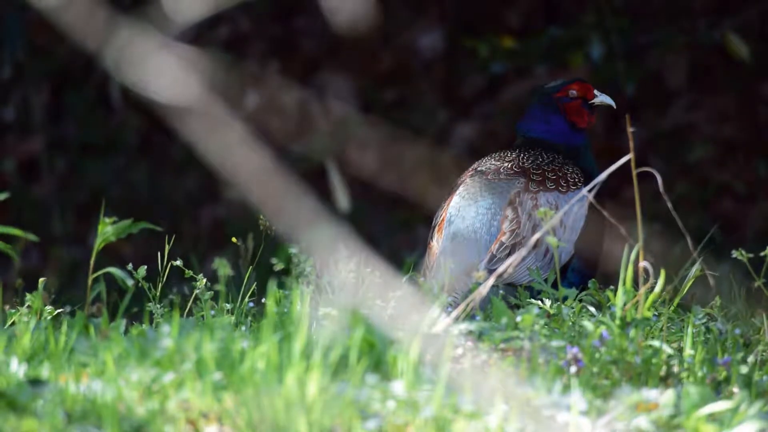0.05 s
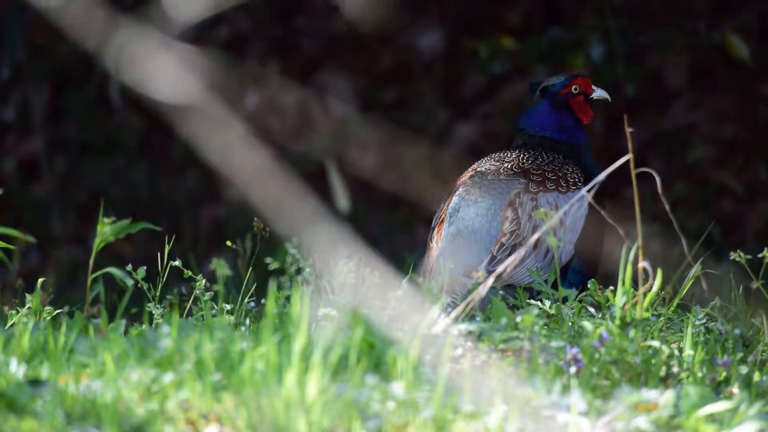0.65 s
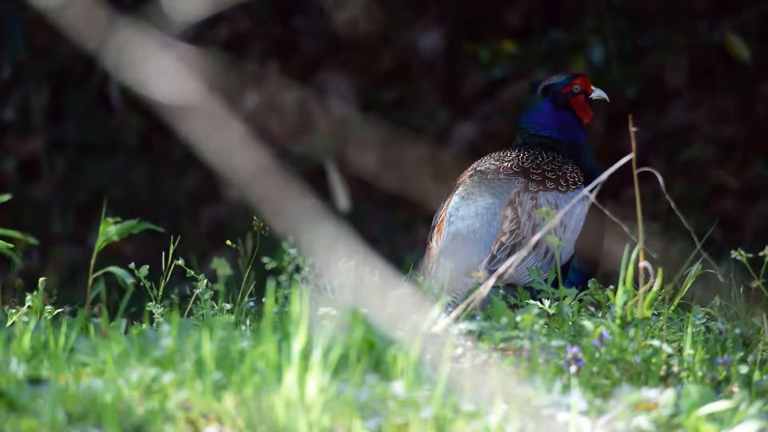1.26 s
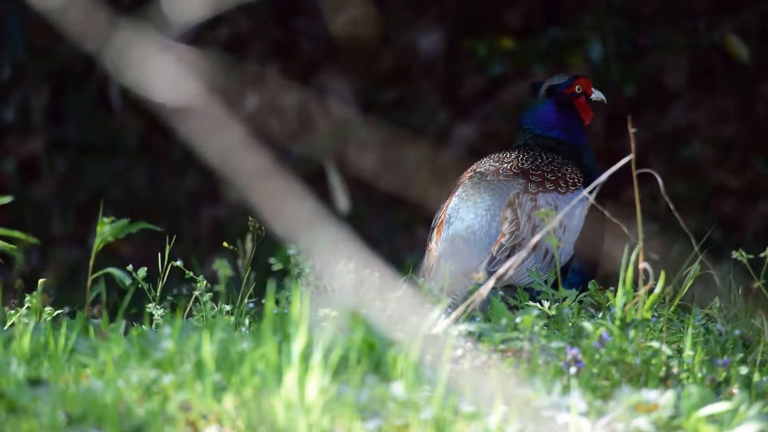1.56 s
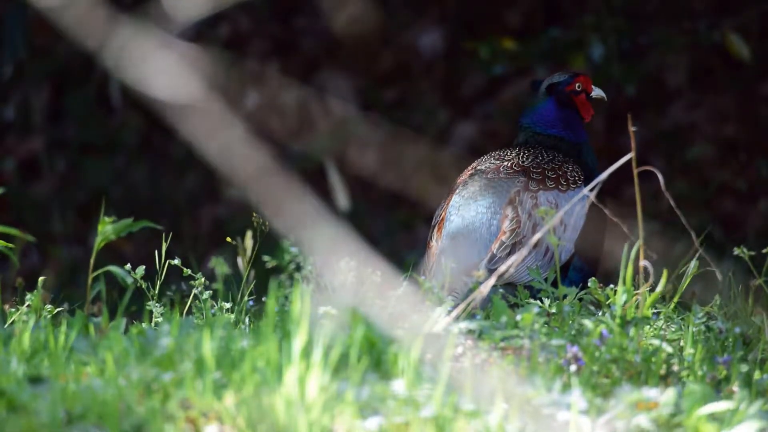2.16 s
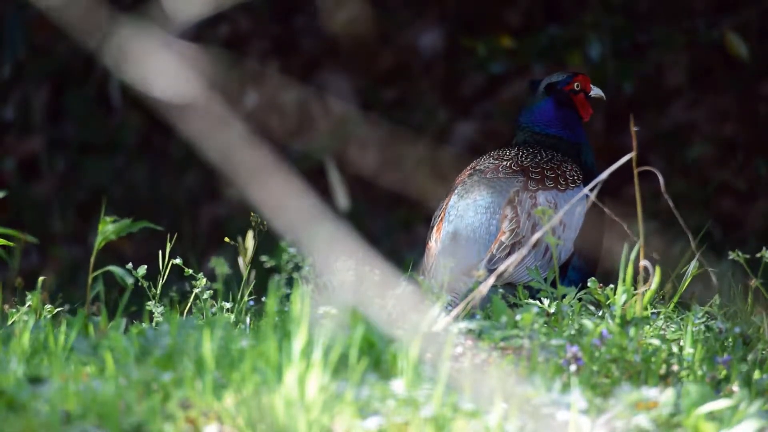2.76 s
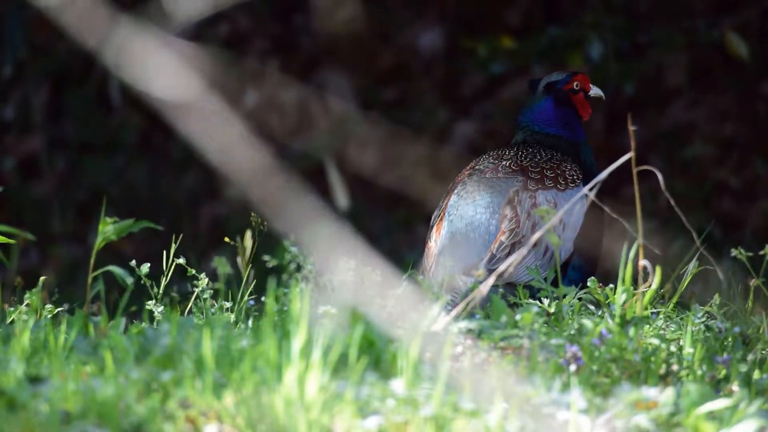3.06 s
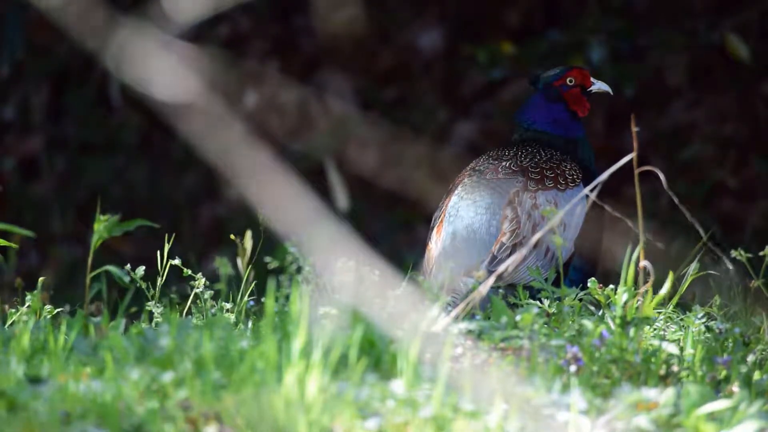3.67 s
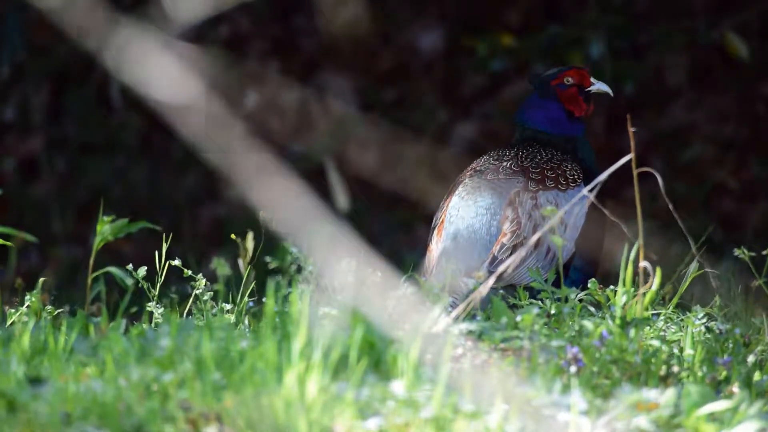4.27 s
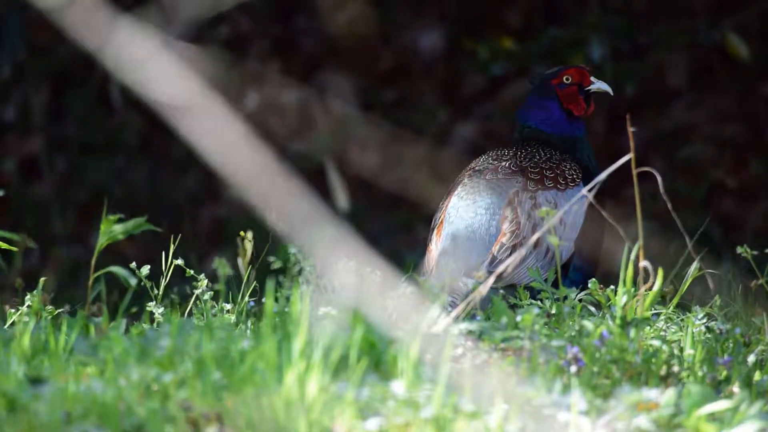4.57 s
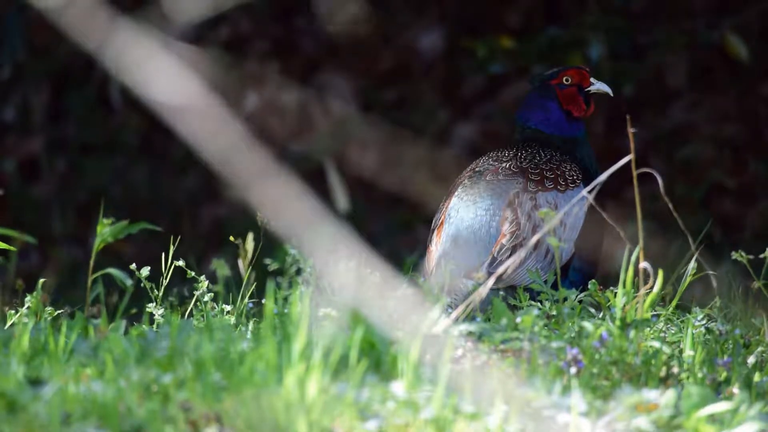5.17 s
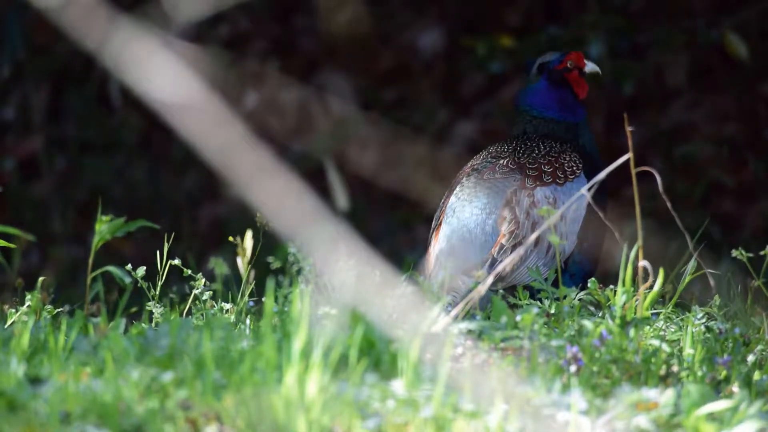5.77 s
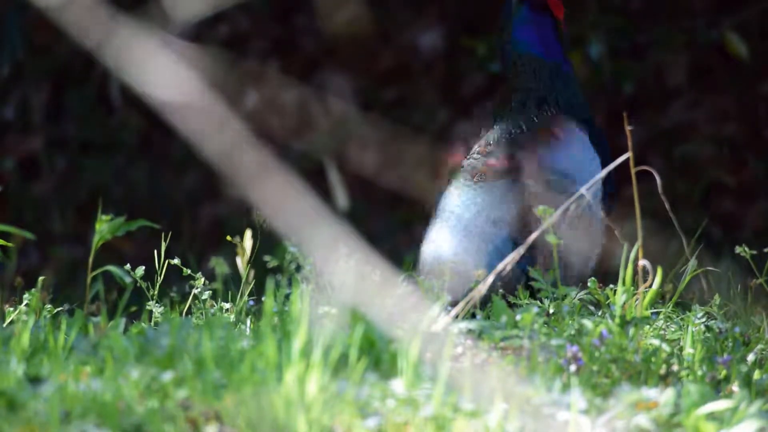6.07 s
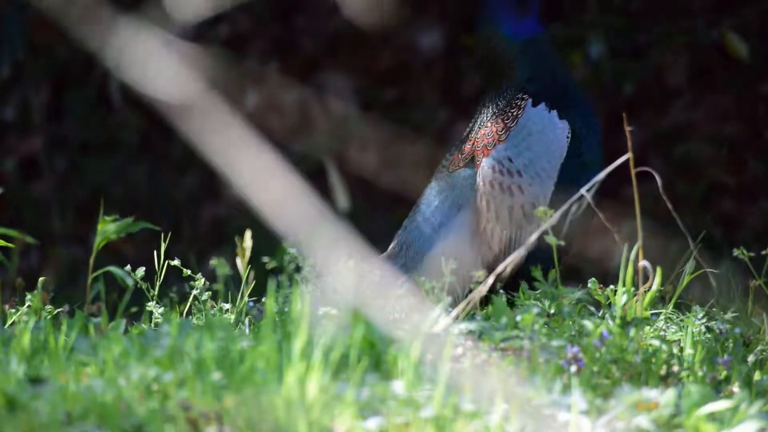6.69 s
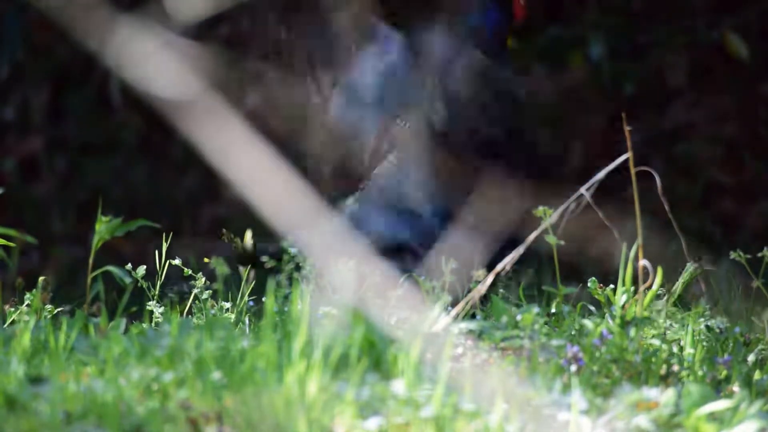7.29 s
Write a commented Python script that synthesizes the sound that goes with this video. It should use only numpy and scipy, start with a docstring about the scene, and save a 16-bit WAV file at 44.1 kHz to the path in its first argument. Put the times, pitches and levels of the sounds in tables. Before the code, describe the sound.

Faint bird calls and a high chirping song lead to two rasping pheasant crows and a quick flutter of wings outdoors.

```python
"""The edge of a wood, on two channels with everything straight ahead of the microphone.
A cock pheasant crows twice, then whirrs his wings. Each crow is a ringing tone from the syrinx under a
rattling rasp of air in the throat; the trees throw it back, and the recorder clicks on the loud second
one. Before it, far birds chip and whistle, grass rustles and a small bird sings looping notes. Behind it
all lies a soft, distant hiss of leaves, with now and then a low bump at the microphone."""
import sys
import numpy as np
from scipy import signal
from scipy.fft import rfft, irfft, next_fast_len
from scipy.io import wavfile
from scipy.ndimage import uniform_filter1d

SR = 44100
rng = np.random.default_rng(int(sys.argv[2]) if len(sys.argv) > 2 else 0)


def generate_wav(signal):
    """Clip the signal to [-1, 1] and save it as 16-bit WAV at the path in sys.argv[1]."""
    frames = np.transpose(np.atleast_2d(signal))
    scaled = np.clip(frames, -1, 1) * 32767
    pcm = np.round(scaled).astype(np.int16)
    wavfile.write(sys.argv[1], SR, pcm)


N = 323253
TIME = np.arange(N) / SR

# Levels in the tables are relative; scene() sets the balance at the microphone.
# spectrum of the distant leaves: (frequency [Hz], level [dB])
LEAF_HISS = [(24, -41), (40, -10.5), (64, -13), (114, -23), (158, -12), (192, -21.5), (342, -5.5),
             (417, -9), (577, -5), (722, -6), (973, -7), (1640, -6.5), (3650, -0.5), (5050, -10),
             (15500, -26.5)]
# the breeze lifts and lowers that hiss: (time [s], level [dB])
BREEZE = [(0, 1.5), (.8, -0.5), (1.5, -1), (2.8, 0.2), (4.1, -0.56), (7.33, 0)]
# soft low bumps at the microphone: (time [s], half length [s], level [dB], top of band [Hz])
MIC_BUMPS = [(0.23, 0.031, -47, 190), (0.256, 0.0086, -34.5, 230), (.52, 0.11, -54.5, 150),
             (0.819, 0.051, -50, 140), (1.0, 0.049, -59, 130), (2.55, 0.2, -58, 140),
             (3.487, 0.039, -53.5, 115), (3.749, 0.13, -62.5, 118), (4.349, 0.049, -47, 134),
             (4.8, 0.43, -62, 138), (6.07, 0.035, -55, 134), (6.117, 0.011, -40.5, 165),
             (6.461, 0.014, -49.5, 140)]
# how long the wood rings: (frequency [Hz], time to fall 60 dB [s])
WOOD_DECAY = [(300, 0.22), (1130, 1.76), (2300, 1.42), (4000, 0.78), (6000, 0.69), (12000, 0.32)]
# far whistles: (time [s], length [s], start pitch [Hz], end pitch [Hz], level [dB])
FAR_WHISTLES = [(1.593, 0.2, 994, 978, -55), (1.729, .1, 970, 990, -47.5), (1.827, 0.16, 968, 1002, -53.5),
                (2.02, 0.097, 970, 1013, -44.5), (2.127, 0.13, 969, 1012, -45.5),
                (2.272, 0.12, 989, 979, -44.5), (2.418, 0.17, 1683, 1516, -47),
                (2.467, .07, 2760, 2560, -40), (2.52, 0.14, 2160, 2126, -43.5)]
# faint chips of other birds in the trees: (time [s], length [s], pitch [Hz], level [dB])
FAR_CHIPS = [(0.609, 0.029, 3580, -43), (0.864, 0.029, 3400, -41), (1.08, 0.088, 4750, -51),
             (1.33, 0.043, 3700, -41.5), (1.43, 0.093, 3550, -46), (1.555, 0.12, 4730, -51),
             (4.27, 0.029, 3550, -42.5)]
# rustles in the grass: (time [s], length [s], level [dB], crispness [0-1])
RUSTLES = [(0, 0.4, -50, 0.02), (0.54, 0.011, -48, 0.8), (0.688, .045, -50, 1), (2.167, 0.15, -45, 0.01),
           (2.187, 0.0056, -38, 0), (2.232, .01, -39, .02), (2.279, 0.035, -38, 0.04),
           (2.3, 0.27, -45, 0.26), (2.397, 0.11, -47, 0.6), (2.548, 0.17, -49, 0.1),
           (3.507, 0.15, -39, 0.03)]
# spectrum of a soft, leafy rustle: (frequency [Hz], level [dB])
LEAFY_RUSTLE = [(200, -46), (600, 0), (1000, 5.5), (1350, 8.5), (1900, 0.5), (3300, 8.5), (5000, -5),
                (9000, -53), (16000, -22)]
# spectrum of a crisp rustle: (frequency [Hz], level [dB])
CRISP_RUSTLE = [(1000, -28), (5000, 0.5), (8000, -1), (11000, 1.5), (13500, -18), (16000, -18)]
# the small bird's notes, arches with sloping tops: (time [s], length [s], top at start [Hz],
# top at end [Hz], rise [s], fall [s], level [dB], swell [dB], half-pitch overtone [dB])
SONG_NOTES = [(4.35, 0.082, 3780, 3414, .001, .001, -44, 10, -13),
              (4.414, 0.073, 3583, 3720, 0.0026, 0.0095, -37.5, 9, -13.5),
              (4.636, 0.031, 7480, 5600, 0.0024, 0.0083, -36.5, 4, -54),
              (4.724, 0.13, 4230, 4330, 0.0075, 0.015, -30.5, 3.5, -60),
              (4.879, 0.048, 4950, 3640, .003, 0.0032, -33.5, -4, -60),
              (5.082, 0.14, 4470, 7500, 0.0095, 0.015, -29, 2, -28),
              (5.225, 0.031, 3150, 4070, 0.0119, 0.00085, -33.5, -7, -11),
              (5.393, .119, 6230, 7570, 0.031, .0115, -30.5, 8, -60),
              (5.523, .085, 6250, 6500, .018, .011, -31.5, -3, -60),
              (5.737, 0.11, 6040, 7930, 0.016, .009, -30, 4.5, -57),
              (5.856, .096, 6280, 6700, 0.017, .012, -31, -2.5, -60)]
# its voice thins as it climbs: (pitch [Hz], level [dB])
SONG_STRENGTH = [(2700, -2), (3100, 4), (4200, 4), (5600, -7.5), (6600, -11), (7500, -13)]
# and buzzes more: (pitch [Hz], buzz [0-1])
SONG_BUZZ = [(3000, .15), (4200, .1), (5400, .65), (7400, .7)]
# the pheasant's wingbeats: (time [s], level [dB], squeak pitch [Hz], half length [s], rebound [dB])
WINGBEATS = [(6.838, -18, 3950, 0.0009, -9), (6.894, -16.5, 3790, 0.0015, 0),
             (6.9629, -9, 3910, 0.0015, -3), (7.0300, -10.5, 3880, 0.0019, -15),
             (7.0967, -9, 3824, 0.0019, -30)]
# spectrum of the air pushed by his wings: (frequency [Hz], level [dB])
WING_AIR = [(40, -24), (110, 2.5), (220, 11), (500, 3.5), (900, 5), (1600, -0.5), (3200, 14.5), (5500, 2),
            (8000, -17), (12600, -8.5), (13500, -24), (16000, -36)]
# main tone of his syrinx, from the fundamental up: (partial level [dB])
CROW_PARTIALS = [-5.5, -1, -12.5, -9, -16]
# tone of its other side, from the fundamental up: (partial level [dB])
SECOND_PARTIALS = [-4.5, -41, -2.5, -5, 7, 6, -12, -22]
# throat resonances: (frequency [Hz], width [Hz], level [dB])
THROAT_RESONANCES = [(2700, 690, -13.5), (3680, 180, -10), (3924, 370, 9.5), (4246, 77, 4),
                     (4830, 380, -8.5), (5630, 180, -5.5), (6640, 880, -16.5), (8360, 610, -23.5),
                     (10260, 1400, -22), (11450, 2000, -30)]
# broad turbulence in the open beak: (frequency [Hz], level [dB])
BEAK_AIR = [(200, -7), (550, -9), (850, 3.5), (1500, 4), (2800, -19), (5000, 20.5), (7500, -36),
            (12300, -19), (13300, -20), (16000, -28)]
# the windpipe favours some bands of the rasp, with dark valleys between: (frequency [Hz], level [dB])
WINDPIPE_BANDS = [(2950, 2), (3180, -6), (3400, 9.5), (3570, -4), (3900, -1.5), (4450, 4), (4750, -13),
                  (5150, 3), (5400, 1.5), (5650, 0.5), (6050, 3.5), (6600, -2.5), (8000, -1)]
# surges, two in the first crow and five in the second:
# (time [s], length [s], pitch [Hz], tone level [dB], rasp level [dB], rattle depth [0-1])
CROW_SURGES = [(5.935, 0.27, 1130, -10.5, -8.5, 0.8), (6.146, 0.052, 1116, -13.5, -20.5, 0),
               (6.453, 0.043, 1094, -14.5, -3.5, 0), (6.490, .098, 1125, -24, -7.5, 0.28),
               (6.592, 0.1, 1161, -12.5, -16, 0.1), (6.678, 0.06, 1138, -14, -14.5, 0),
               (6.718, 0.11, 1164, -24, -23, 0.27)]
# two sharp clicks from the recorder as the loud second crow overloads it: (time [s], level [dB])
OVERLOAD_CLICKS = [(6.4817, -11), (6.5385, -17)]
# the recorder's own hiss: (frequency [Hz], level [dB])
SELF_NOISE = [(30, 0), (500, -2), (2000, -14), (4000, -8), (6500, 0), (13000, -1), (16000, -2)]


def amp(db):
    """Decibels to gain."""
    return 10 ** (np.asarray(db) / 20)


def unit(x):
    """Scales to rms 1."""
    return x / np.sqrt(np.mean(x ** 2) + 1e-20)


def read(points, hz):
    """Reads a curve on a log-frequency axis."""
    f, value = np.transpose(points)
    return np.interp(np.log(hz + 1), np.log(f + 1), value)


def add(mix, s, sound):
    """Mixes a sound in at s seconds."""
    part = mix[max(round(s * SR), 0):][:len(sound)]
    part += sound[:len(part)]


def noise(n):
    """White noise, n samples long and a second at most."""
    return rng.standard_normal(SR)[:n]


def colour(x, points):
    """Filters x by a spectrum, at rms 1."""
    size = next_fast_len(len(x))
    gain = amp(read(points, np.fft.rfftfreq(size, 1 / SR)))
    return unit(irfft(rfft(x, size) * gain, size)[:len(x)])


def wander(n, hz):
    """Random motion up to a rate, at rms 1."""
    return unit(signal.sosfilt(signal.butter(2, hz, fs=SR, output="sos"), noise(n)))


def resonate(x, hz, width):
    """A two-stage resonance of gain 1."""
    turn = np.exp(2j * np.pi * hz * np.arange(len(x)) / SR)
    r = np.exp(-np.pi * width / SR)
    return 2 * (turn * signal.lfilter([(1 - r) ** 2], [1, -2 * r, r * r], x / turn)).real


def envelope(length, attack_s, release_s, db_per_s=0):
    """Sample times and gain of a smooth attack, a sloping hold and a release."""
    t = np.arange(int(length * SR)) / SR
    onset = np.sin(np.pi / 2 * np.minimum(t / attack_s, 1))
    ending = np.sin(np.pi / 2 * np.minimum((length - t) / release_s, 1))
    return t, (onset * ending) ** 2 * amp(db_per_s * t)


def leaves():
    """Leaves in the distance: a hiss that follows the breeze."""
    breeze_db = np.interp(TIME, *np.transpose(BREEZE))
    return amp(-42.5 + breeze_db) * colour(rng.standard_normal(N), LEAF_HISS)


def mic_bumps():
    """Brief swells of low rumble, right at the microphone."""
    out = np.zeros(N)
    for s, half_length, db, top_hz in MIC_BUMPS:
        band = signal.butter(3, [top_hz / 3.4, top_hz], "band", fs=SR, output="sos")
        rumble = signal.sosfilt(band, noise(SR))
        start = max(s - .5, 0)
        swell = np.exp(-((TIME[:SR] + start - s) / half_length) ** 2)
        add(out, start, amp(db) * unit(rumble * swell) * np.sqrt(np.mean(swell ** 2)))
    return out


def overload_clicks(decay_s):
    """Two sharp clicks from the recorder, placed where the loud second crow overloads it."""
    out = np.zeros(N)
    click = np.diff(np.exp(-TIME[:200] / decay_s), prepend=0)
    for s, db in OVERLOAD_CLICKS:
        add(out, s, amp(db) * click)
    return out


def wood_echoes(x, early_db, early_s, echoes_per_s=2500):
    """A quick cluster of echoes from the near ground and brush, then a long tail from the trunks."""
    t = TIME[:SR * 3 // 2]
    taps = rng.choice([-1., 1.], len(t)) * (rng.random(len(t)) < echoes_per_s / SR) * (t > .003)
    taps *= 1 + amp(early_db) * np.exp(-t / early_s)
    hz, delay, bands = signal.stft(taps, SR, nperseg=256)
    decay = amp(-60 * delay / read(WOOD_DECAY, hz)[:, None])
    tail = signal.istft(bands * decay, SR, nperseg=256)[1]
    return signal.fftconvolve(x, tail / np.linalg.norm(tail))[:N]


def far_whistle(s, length, first_hz, last_hz, db):
    """A plain whistle from deep in the wood; the higher notes warble much more."""
    t, gate = envelope(length, attack_s=.028, release_s=.028)
    hz = first_hz + (last_hz - first_hz) * t / length
    warble = .006 * (hz / 1000) ** 2.9 * wander(len(t), 200)
    turns = np.cumsum(hz * (1 + warble)) / SR
    return s, np.sqrt(2) * amp(db) * gate * np.sin(2 * np.pi * turns)


def far_chip(s, length, hz, db):
    """A short wavering peep, off in the trees."""
    n = int(length * SR)
    turns = np.cumsum(hz * (1 + 0.024 * wander(n, 170))) / SR
    return s, np.sqrt(2) * amp(db) * np.sin(2 * np.pi * turns) * signal.windows.tukey(n, .6)


def rustle(s, length, db, crisp):
    """Down in the grass, a clump of tiny snaps of leaves and dry blades."""
    n = int(length * SR)
    snaps = noise(n) * amp(5 * np.minimum(noise(n), 2.8) + 2 * wander(n, 150))
    soft = np.sqrt(1 - crisp) * colour(snaps, LEAFY_RUSTLE)
    bright = np.sqrt(crisp) * colour(snaps, CRISP_RUSTLE)
    return s, amp(db) * (soft + bright) * signal.windows.tukey(n, .25)


def song_note(s, length, first_hz, last_hz, rise, fall, db, swell_db, half_db):
    """The small bird: an arching whistle that buzzes at its top and thins out in its fastest leaps."""
    foot_hz, leap_hz_per_s = 2800, 310000  # where each arch starts and ends; glide that costs 3 dB
    t, gate = envelope(length, attack_s=.003, release_s=.003)
    arch = np.tanh((t / rise) ** 1.5) * np.tanh((length - t) / fall)
    dome = 1 - 0.0347 * (2 * t / length - 1) ** 2  # the top droops toward both ends
    top_hz = (first_hz + (last_hz - first_hz) * t / length) * dome
    hz = foot_hz + arch * (top_hz - foot_hz)
    level_db = db + swell_db * (t / length - .5) + read(SONG_STRENGTH, hz)
    leap = abs(np.gradient(hz)) * SR / leap_hz_per_s
    buzz = read(SONG_BUZZ, hz)
    shiver = .035 * buzz * wander(len(t), 900)
    flutter_db = (.6 + 4 * buzz) * wander(len(t), 160)
    angle = 2 * np.pi * np.cumsum(hz * (1 + shiver)) / SR
    half_pitch = np.sin(angle * 3 / 2) + 0.25 * np.sin(angle / 2)
    whistle = np.sin(angle) + amp(half_db) * half_pitch + amp(-28) * np.sin(2 * angle)
    return s, np.sqrt(2) * gate * amp(level_db + flutter_db) * whistle / np.sqrt(1 + leap ** 2)


def feather_squeak(s, db, hz, half_length):
    """Flight feathers rub in a short falling chirp, centred on s seconds."""
    t = np.arange(-400, 400) / SR
    turns = np.cumsum(hz * (1 - 0.099 * np.tanh(t / 0.0022))) / SR
    chirp = np.sin(2 * np.pi * turns) + amp(-20.5) * colour(noise(len(t)), WING_AIR)
    return s + t[0], amp(db) * np.exp(-(t / half_length) ** 2) * chirp


def wings(whirr_s=6.715, beat_hz=15, mid_stroke_s=7.047):
    """Each wingbeat squeaks twice and once more on the rebound, over a pulsing whirr of pushed air."""
    out = np.zeros(N)
    for s, db, hz, half_length, rebound_db in WINGBEATS:
        add(out, *feather_squeak(s, db, hz, half_length))
        add(out, *feather_squeak(s + .018, db, hz, half_length))
        add(out, *feather_squeak(s + .034, db + rebound_db, hz, half_length / 2))
    t, effort = envelope(0.514, attack_s=0.077, release_s=0.18, db_per_s=9)
    flicks = unit(amp(3.8 * wander(len(t), 100)))  # single feathers catch the air
    strokes = 1 + 0.38 * np.cos(2 * np.pi * beat_hz * (whirr_s + t - mid_stroke_s))
    add(out, whirr_s, amp(-39) * effort * strokes * flicks * colour(noise(len(t)), WING_AIR))
    return out


def syrinx(hz, partials, jitter, jitter_hz):
    """A membrane with uneven cycles, which smear its high partials. Returns cycles and sound."""
    turns = np.cumsum(hz * (1 + jitter * wander(len(hz), jitter_hz))) / SR
    # k * k: the windpipe delays each partial differently
    tone = sum(amp(db) * np.cos(2 * np.pi * k * turns + k * k) for k, db in enumerate(partials, 1))
    return turns, unit(tone)


def second_voice(s, start_hz=902.5, drop_hz=27.65, settle_s=0.0214):
    """The other side of the syrinx: a lower, brighter tone that sags and clashes with the main one."""
    t, effort = envelope(0.158, attack_s=0.036, release_s=0.027, db_per_s=-66)
    hz = start_hz - drop_hz * (1 - np.exp(-t / settle_s))
    _, tone = syrinx(hz, SECOND_PARTIALS, jitter=0.018, jitter_hz=403)
    return s, amp(-9) * effort * tone


def shriek(turns, beat, centre_hz=4064, arch=0.032, jitter=0.0361):
    """An unsteady high whistle that arches with each rattle; the main tone gives it sidebands."""
    hz = centre_hz * (1 + arch * beat + jitter * wander(len(beat), 352))
    angle, shake = 2 * np.pi * np.cumsum(hz) / SR, 2 * np.pi * turns
    above = np.sin(angle + shake)
    below = amp(-8) * np.sin(angle - shake) + amp(-16.5) * np.sin(angle - 2 * shake)
    return unit(np.sin(angle) + amp(-12.5) * (above + below) + amp(-48) * np.sin(2 * angle))


def throat_rasp(turns, beat, shriek_share=.55):
    """Puffs of air ring the throat and join the shriek and beak turbulence, shaped by the windpipe."""
    puffs = (1 + 0.27 * np.cos(2 * np.pi * turns)) * noise(len(turns))
    air = unit(sum(amp(db) * resonate(puffs, hz, width) for hz, width, db in THROAT_RESONANCES))
    rasp = np.sqrt(shriek_share) * shriek(turns, beat) + np.sqrt(1 - shriek_share) * air
    # the membrane's swing is bounded, so the rasp keeps an even strength between rattles
    rasp = unit(rasp / np.sqrt(uniform_filter1d(rasp ** 2, size=130) + 0.14))
    return colour(rasp + amp(-13.5) * colour(puffs, BEAK_AIR), WINDPIPE_BANDS)


def crow_surge(s, length, pitch_hz, tone_db, rasp_db, rattle_depth):
    """One push of the pheasant's crow: a ringing tone swells behind a rattling rasp, sags and stops."""
    rattle_hz, first_rattle_s, rattle_fade_s = 65.3, 5.9495, .14
    t, effort = envelope(length, attack_s=0.022 + 0.07 * length, release_s=0.024, db_per_s=-33.5)
    hz = pitch_hz - 95 * t  # pitch sinks with the pressure
    turns, tone = syrinx(hz, CROW_PARTIALS, jitter=0.014, jitter_hz=487)
    swell = 1 - np.exp(-t / (0.052 * length))
    depth = rattle_depth * np.exp(-t / rattle_fade_s)
    beat = np.cos(2 * np.pi * rattle_hz * (s + t - first_rattle_s))
    rattle = (1 + depth * beat) / np.sqrt(1 + depth ** 2 / 2)
    rasp = throat_rasp(turns, beat * np.minimum(2 * depth, 1))
    return s, effort * (amp(tone_db) * swell * tone + amp(rasp_db) * rattle * rasp)


def scene():
    """Everything reaches the microphone from straight ahead; only the birds echo in the wood."""
    pheasant, songbird, far_birds, grass = np.zeros((4, N))
    for row in CROW_SURGES:
        add(pheasant, *crow_surge(*row))
    add(pheasant, *second_voice(s=6.503))
    for row in SONG_NOTES:
        add(songbird, *song_note(*row))
    for row in FAR_WHISTLES:
        add(far_birds, *far_whistle(*row))
    for row in FAR_CHIPS:
        add(far_birds, *far_chip(*row))
    for row in RUSTLES:
        add(grass, *rustle(*row))
    flaps = wings()
    direct = amp(-4) * pheasant + amp(-2.5) * songbird + amp(-1.5) * far_birds + flaps
    into_wood = amp(-10) * pheasant + amp(-5) * songbird + amp(-16.5) * far_birds + amp(-15.5) * flaps
    echoes = wood_echoes(into_wood, early_db=5, early_s=0.059)
    mono = direct + overload_clicks(decay_s=.00005) + grass + echoes + mic_bumps() + leaves()
    return np.array([mono, mono])


def record(dry):
    """Each channel adds faint hiss and a small offset, overloads at full scale and is band-limited."""
    offset, cutoff_hz = 0.0025, 15820
    hiss = amp(-58) * np.array([colour(white, SELF_NOISE) for white in rng.standard_normal((2, N))])
    clipped = np.clip(dry + hiss + offset, -1, 1)
    lowpass = signal.firwin(511, cutoff_hz, window=("kaiser", 9), fs=SR)
    return signal.oaconvolve(clipped, lowpass[None], "same")


dry = scene()
out = record(dry)
generate_wav(out)
```